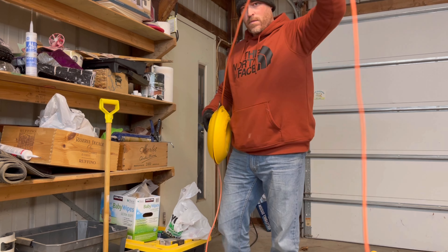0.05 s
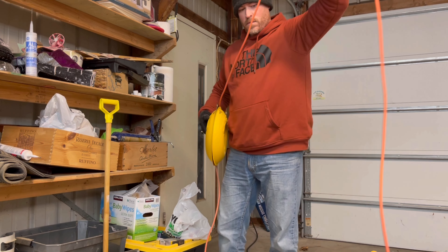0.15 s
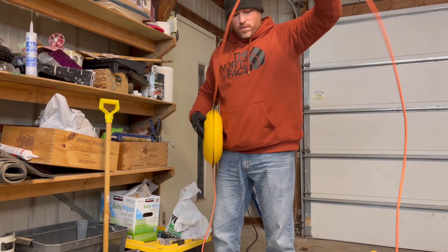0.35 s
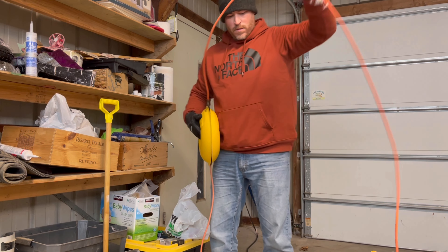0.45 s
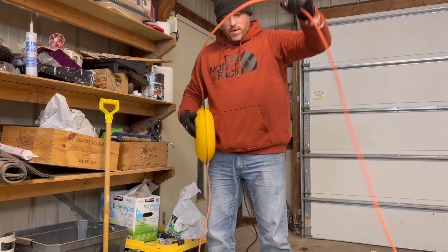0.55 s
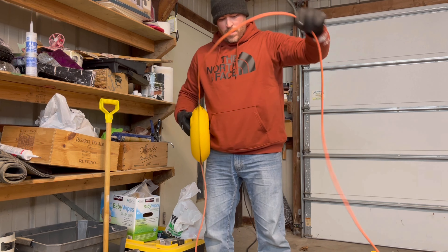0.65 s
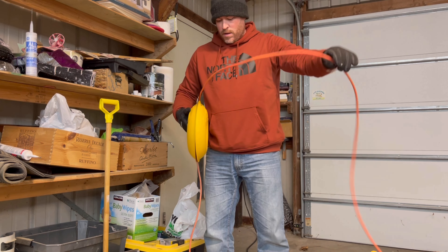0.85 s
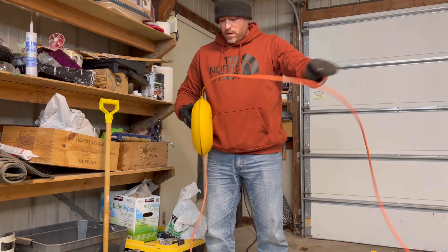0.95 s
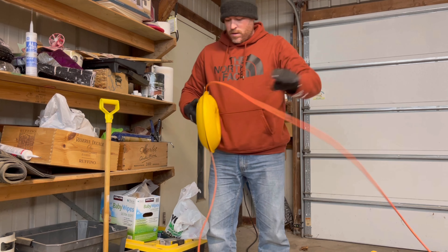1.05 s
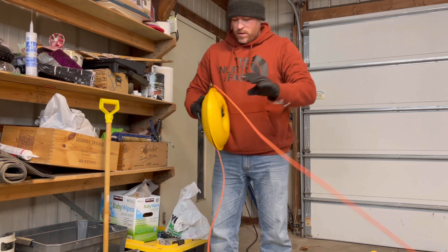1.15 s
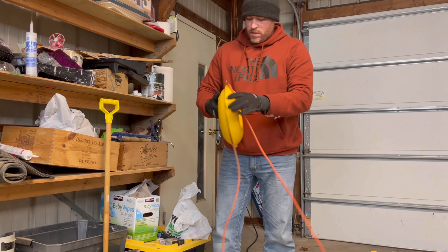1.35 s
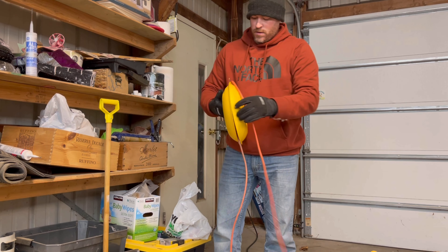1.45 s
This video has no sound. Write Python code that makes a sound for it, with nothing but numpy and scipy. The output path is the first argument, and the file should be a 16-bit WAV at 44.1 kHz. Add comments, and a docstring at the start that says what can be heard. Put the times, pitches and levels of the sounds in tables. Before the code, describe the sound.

An extension cord smacks sharply onto a concrete garage floor at about 0.2 seconds, and nearby metal rings faintly. From 0.35 to 0.9 seconds coils knock irregularly over a hollow plastic reel, with a crisp click at 0.6, while the cord hisses softly through a glove. Around 1.3 seconds the cord clacks and a gloved hand thumps the reel. Clothes rustle quietly over a faint low hum.

```python
"""In a garage, an extension cord is pulled by the armful off a hollow plastic reel.
The thrown cord smacks the concrete and sets metal things ringing; coils knock over the rim one by one.
The cord hisses through a work glove, and the hand comes back to grab the reel with a thump.
Underneath, clothes rustle over a low rumble of air and a faint hum."""
import sys
import numpy as np
from scipy import signal
from scipy.fft import rfft, irfft, next_fast_len
from scipy.io import wavfile
from scipy.ndimage import uniform_filter1d

SR = 44100
rng = np.random.default_rng(int(sys.argv[2]) if len(sys.argv) > 2 else 0)


def log_audio(samples):
    """Write samples as a 16-bit WAV file to the path given in sys.argv[1]."""
    # one column per channel
    frames = np.atleast_2d(samples).T
    # limit to full scale, then quantise
    limited = np.clip(frames, -1, 1)
    pcm = np.round(limited * 32767).astype(np.int16)
    wavfile.write(sys.argv[1], SR, pcm)


N = 66150
T = np.arange(N) / SR
FFT_SIZE = next_fast_len(2 * N)
HZ = np.maximum(np.arange(FFT_SIZE // 2 + 1) * SR / FFT_SIZE, 1)


# The cord lands in two quick hits: t/s, level/dB
SMACK_HITS = [(0.2250, -3), (0.2338, -23)]
# Hard, bright EQ of cord on concrete: f/Hz, level/dB
SMACK_EQ = [(100, -23), (300, -12.5), (560, 0), (750, -2), (950, 5.5), (1400, -1), (2000, 3.5),
            (2600, -3.5), (3500, -2), (5000, -5), (6300, -6), (8500, 2.5), (11500, -5), (15000, -12.5)]
# Short midrange crack on the attack: f/Hz, level/dB, t60/s
CRACK_MODES = [(887, -30.5, 0.0097), (1170, -36, 0.019), (1650, -34, .01)]
# Long ring of metal things nearby: f/Hz, level/dB, t60/s
METAL_MODES = [(567.5, -42, 0.38), (685, -46.5, 0.66), (745, -55, 1.74), (873, -41, 0.37),
               (1062, -45.5, 0.42), (1116, -42.5, 0.36), (1945, -51.5, 1.43), (2331, -57, 1.6),
               (2490, -53, 0.79), (2944, -48, 0.51), (3370, -47.5, 0.42), (3300, -43, 0.46),
               (3870, -51, 0.54), (5940, -52, .4), (6574, -49, 0.3), (8312, -43.5, 0.63), (9330, -42, 0.12)]

def floor_smack(room):
    """The cord whips onto the concrete with a crack; metal things nearby ring on."""
    right_lead_s = 0.000275
    hits = sum(contact(t, db, decay_s=0.0018, rise_share=1.2) for t, db in SMACK_HITS)
    smack = place(colour(hits, SMACK_EQ), room, reverb_db=3.5, right_lead_s=right_lead_s)
    impulse = delay(1. * (T == 0), SMACK_HITS[0][0])
    crack = ring(impulse, CRACK_MODES)
    return smack + np.array([delay(crack, right_lead_s), crack]) + ring(impulse, METAL_MODES)


# Coils bumping over the rim: t/s, relative level/dB, nominal decay/s, bass shelf/dB, treble shelf/dB
COIL_HITS = [(0.353, -11.5, 0.0115, 6.5, -5), (0.379, -12.5, 0.0098, 13, 1),
             (0.4738, -14.5, 0.0054, -21, 4.5), (0.477, -10, 0.0073, -8.5, -7.5),
             (0.504, -15, 0.003, -12.5, -23), (0.550, -20.5, 0.002, -2, -16),
             (0.6162, -13, 0.0022, -2.5, -0.5), (0.6224, -19, 0.0025, 3, -7), (0.730, -17, 0.0097, 10, 12),
             (0.744, -16, 0.0144, 12.5, 3.5), (0.887, -21.5, 0.015, -1.5, -0.5),
             (1.299, -23.5, 0.0069, 13, -6)]
# Boxy EQ shared by the knocks: f/Hz, level/dB
KNOCK_EQ = [(100, -33.5), (240, -20.5), (480, 0), (950, 5), (1300, -1), (2000, -6.5), (3500, -18.5),
            (6000, -29), (9000, -24), (14000, -41)]
# Hollow body of the reel: f/Hz, level/dB, t60/s
SHELL_MODES = [(475, -51.5, 0.2), (590, -46.5, 0.096), (739, -53.5, 0.11), (908, -52, 0.066),
               (1109, -45.5, 0.077), (1509, -50, 0.068), (1944, -45, .06)]

def coil_knocks(room):
    """Each coil scuffs over the rim with its own tone and rings the hollow shell."""
    bass_shelf = 1 / (1 + (HZ / 500) ** 4)
    treble_shelf = 1 / (1 + (2600 / HZ) ** 2)
    scuffs = np.zeros(N)
    for t, db, decay_s, bass_db, treble_db in COIL_HITS:
        scuff = contact(t, db, decay_s, rise_share=0.33)
        scuffs += colour(scuff, KNOCK_EQ, bass_db * bass_shelf + treble_db * treble_shelf)
    knocks = scuffs + ring(scuffs, SHELL_MODES)
    return place(from_db(-4) * knocks, room, reverb_db=-1)


# Hard ticks on the plastic: t/s, level/dB
TICK_HITS = [(0.6156, -24.5), (0.6302, -55), (0.798, -42), (1.298, -34)]
# Crisp EQ of the ticks: f/Hz, level/dB
TICK_EQ = [(300, -6), (2000, 2.5), (3500, 0), (5500, -2), (9000, 3.5), (12000, 2.5), (16000, -1.5)]

def plastic_ticks(room):
    """The cord lands on the hard plastic with tiny, sharp clicks."""
    ticks = sum(contact(t, db, decay_s=0.00061) for t, db in TICK_HITS)
    return place(colour(ticks, TICK_EQ), room, reverb_db=3)


# The glove lands on the reel: t/s, level/dB, nominal decay/s
GRAB_HITS = [(1.3236, -20, 0.0056), (1.377, -29, 0.0061)]
# Padded, bassy EQ of the glove: f/Hz, level/dB
GRAB_EQ = [(80, -21), (200, 4.5), (340, 5.5), (600, -9), (1200, -7), (1900, -23), (2800, -18.5),
           (6000, -28), (14000, -23)]
# Low body of the thump: f/Hz, level/dB, t60/s
THUMP_MODES = [(257, -49, 0.097), (356, -33.5, 0.063)]
# Peaky midrange EQ of cord on shell: f/Hz, level/dB
CLACK_EQ = [(200, -11), (700, 9.5), (1250, -7), (1700, 6), (2050, 4), (2700, -15), (6000, -24),
            (14000, -42)]

def reel_grab(room):
    """The cord clacks on the shell as a gloved hand thumps the reel."""
    hits = sum(contact(t, db, decay_s, rise_share=0.33) for t, db, decay_s in GRAB_HITS)
    thump = colour(hits, GRAB_EQ)
    clack = colour(contact(t=1.3212, db=-25, decay_s=0.003), CLACK_EQ)
    return place(thump + ring(thump, THUMP_MODES) + clack, room, reverb_db=-8)


# Fader ride of the sliding cord: t/s, relative level/dB
SLIDE_FADER = [(0, -100), (0.2, -76), (0.45, -56), (0.65, -53.5), (0.785, -59), (0.805, -46.5),
               (0.86, -53.5), (0.93, -71), (1.0, -73), (1.28, -81), (1.315, -55.5), (1.35, -50.5),
               (1.41, -63.5), (1.45, -62.5), (1.5, -87)]
# Mid-heavy EQ of the rub: f/Hz, level/dB
SLIDE_EQ = [(100, -18), (500, 5.5), (1000, 6), (2000, 4.5), (3200, -1), (4500, -5.5), (6500, -9),
            (9000, -8), (12000, -14), (15000, -93)]

def cord_slide(room):
    """The cord rubs through the glove: tiny friction catches over a smooth hiss."""
    catches_per_s, catch_share = 1500, 0.58
    catches = unit_rms((rng.random(N) < catches_per_s / SR) * rng.standard_normal(N))
    rub = np.sqrt(catch_share) * catches + np.sqrt(1 - catch_share) * rng.standard_normal(N)
    slide = colour(rub * fader(SLIDE_FADER), SLIDE_EQ)
    return from_db(-6.5) * place(slide, room, reverb_db=1)


# Fader ride of the rustle: t/s, level/dB
RUSTLE_FADER = [(0, -68.5), (0.12, -82), (0.2, -68.5), (0.32, -57), (0.9, -61.5), (1.05, -63),
                (1.18, -59.5), (1.28, -61), (1.38, -57.5), (1.5, -59)]
# Soft, dull EQ of the rustle: f/Hz, level/dB
RUSTLE_EQ = [(60, -10.5), (200, -1), (350, -4.5), (550, 3.5), (900, 0), (1400, -7.5), (2200, -15.5),
             (3500, -23.5), (6000, -29), (9000, -22), (14000, -24.5)]

def clothes_rustle():
    """Clothes and loose cord brush about in a wide wash of noise."""
    return fader(RUSTLE_FADER) * colour(diffuse_noise(), RUSTLE_EQ)


# Deep EQ of the garage air: f/Hz, level/dB
AIR_EQ = [(15, -39.5), (30, -22), (50, -0.5), (70, -5), (110, -10.5), (200, -23.5), (400, -21.5),
          (1000, -31), (3000, -66), (6000, -60), (8500, -47.5), (14000, -72)]

def room_tone():
    """A steady bed of rumbling air with a low hum."""
    air = unit_rms(colour(diffuse_noise(), AIR_EQ))
    hum = np.sqrt(2) * np.sin(2 * np.pi * 51.5 * T)
    return from_db(-62) * air + from_db(-69.5) * hum


# Stereo width: f/Hz, left-right likeness (a correlation once clipped to just under 1)
STEREO_LIKENESS = [(50, 3.5), (150, 0.64), (320, 1.37), (800, 0.06), (2000, -0.08), (4500, 0.42),
                   (8000, 0.48)]

def diffuse_noise():
    """White noise arriving from all round: near mono in the bass, wider higher up."""
    alike = np.clip(at_hz(STEREO_LIKENESS, HZ), -.99, .995)
    mid, side = rfft(rng.standard_normal((2, FFT_SIZE)))
    mid, side = mid * np.sqrt(1 + alike), side * np.sqrt(1 - alike)
    return unit_rms(irfft(np.array([mid + side, mid - side]), FFT_SIZE)[:, :N])


# Reverb time of the garage: f/Hz, t60/s
REVERB_TIMES = [(100, 0.13), (500, 0.83), (1000, 0.65), (2000, .58), (4000, 1.12), (8000, 0.26),
                (13000, 0.44)]

def garage_reverb():
    """A stereo impulse response of unit energy; each octave dies at its own rate."""
    swell = 1 - np.exp(-(T / 0.0046) ** 2)
    spectrum = rfft(diffuse_noise() * swell * from_db(-60 * T / 0.78), FFT_SIZE)
    spectrum /= np.mean(abs(spectrum) ** 2, axis=0) ** 0.25  # soften peaks and notches
    centres = np.geomspace(100, 12800, 8)
    tail = 0
    for hz, one_hot in zip(centres, np.eye(len(centres))):
        octave = np.interp(np.log(HZ), np.log(centres), one_hot)
        band = irfft(spectrum * octave, FFT_SIZE)[:, :N]
        envelope = np.sqrt(uniform_filter1d(np.mean(band ** 2, axis=0), size=4001) + 1e-30)
        held = band / envelope * np.std(band[:, :SR // 10])  # hold the opening level
        tail = tail + held * from_db(-60 * T / at_hz(REVERB_TIMES, hz))
    return unit_rms(tail * swell) / np.sqrt(N)


# Early reflections: delay/s, level/dB
REFLECTIONS = [(.0074, -15), (0.0098, -17.5)]

def place(x, room, reverb_db, right_lead_s=0):
    """Set a mono sound in the garage: direct sound, early reflections and reverb."""
    near = x + sum(from_db(db) * delay(x, s) for s, db in REFLECTIONS)
    reverb = signal.fftconvolve(x[None], room, axes=1)[:, :N]
    return np.array([delay(near, right_lead_s), near]) + from_db(reverb_db) * reverb


def contact(t, db, decay_s, rise_share=0):
    """A dying burst of tiny impacts with energy db; its rise time is a share of decay_s."""
    attack = 1 - np.exp(-(T + 1 / SR) / (rise_share * decay_s + 1e-6))
    envelope = attack * np.exp(-T / decay_s)
    burst = rng.standard_normal(N) * envelope
    for _ in range(3):  # flatten the spectrum, then gather the burst in time again
        spectrum = rfft(burst)
        burst = irfft(spectrum / (abs(spectrum) + 1e-20), N) * envelope ** 0.25
    return delay(from_db(db) * unit_rms(burst) / np.sqrt(N), t)


def ring(x, modes):
    """Resonances driven by x: decaying sines of alternating sign."""
    response = sum((-1) ** k * from_db(db - 60 * T / t60) * np.sin(2 * np.pi * hz * T)
                   for k, (hz, db, t60) in enumerate(modes))
    return signal.fftconvolve(x, response)[:N]


def colour(x, eq, extra_db=0):
    """Apply an EQ curve, scaled so that white noise keeps its power."""
    return minimum_phase(x, unit_rms(from_db(at_hz(eq, HZ) + extra_db)))


def minimum_phase(x, gain):
    """Filter by a gain at each frequency, with no pre-ring."""
    cepstrum = irfft(np.log(gain), FFT_SIZE)
    cepstrum[1:FFT_SIZE // 2] *= 2
    cepstrum[FFT_SIZE // 2 + 1:] = 0
    return irfft(rfft(x, FFT_SIZE) * np.exp(rfft(cepstrum)), FFT_SIZE)[..., :N]


def at_hz(points, hz):
    """Read a table on a log-frequency axis."""
    freqs, values = np.transpose(points)
    return np.interp(np.log(hz), np.log(freqs), values)


def fader(points):
    """Gain over time from points of t/s, level/dB."""
    return from_db(np.interp(T, *np.transpose(points)))


def delay(x, seconds):
    """The same sound, later."""
    return np.concatenate([np.zeros(int(seconds * SR)), x])[:N]


def from_db(db):
    """Decibels to gain."""
    return 10 ** (np.asarray(db) / 20)


def unit_rms(x):
    """Scale to rms 1."""
    return x / np.sqrt(np.mean(x ** 2) + 1e-30)


def scene():
    """Cord, reel and glove share one garage, over the rustle and room tone."""
    room = garage_reverb()
    impacts = floor_smack(room) + coil_knocks(room) + plastic_ticks(room) + reel_grab(room)
    return impacts + cord_slide(room) + clothes_rustle() + room_tone()


# Stereo lean of the microphone: f/Hz, left minus right level/dB
MIC_BALANCE = [(100, 1), (330, -3.4), (620, 3), (1100, 5), (1700, 2.5), (3000, 4), (5000, 5.5), (8500, 1.8),
               (12000, -8.2)]

def record(dry):
    """The microphone leans left in the mids, is near mono above a treble notch and cuts the very top."""
    notch_hz, width_hz, notch_depth_db, cutoff_hz = 10130, 283, -28.5, 11950
    lean_db = at_hz(MIC_BALANCE, HZ) / 2
    notch_db = notch_depth_db * np.exp(-((HZ - notch_hz) / width_hz) ** 2)
    left = minimum_phase(dry[0], from_db(notch_db + lean_db))
    right = minimum_phase(dry[1], from_db(notch_db - lean_db))
    mono_share = 0.9 * (.5 + .5 * np.tanh((HZ - notch_hz) / width_hz))
    right = right + irfft(rfft(left - right, FFT_SIZE) * mono_share, FFT_SIZE)[:N]
    lowpass = signal.ellip(8, .3, 70, cutoff_hz, fs=SR, output="sos")
    return signal.sosfilt(lowpass, np.array([left, right]))


dry = scene()
out = record(dry)
log_audio(out)
```